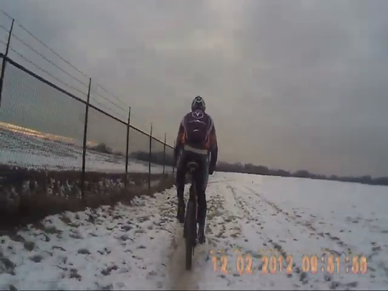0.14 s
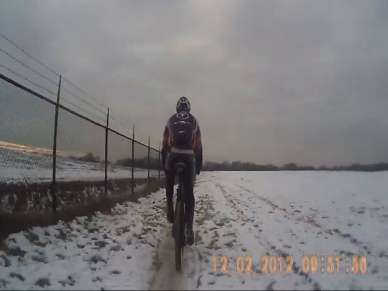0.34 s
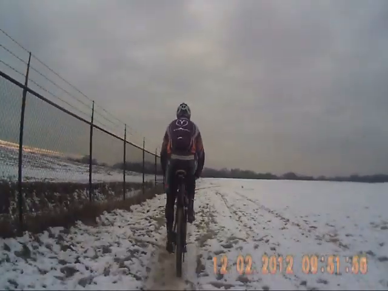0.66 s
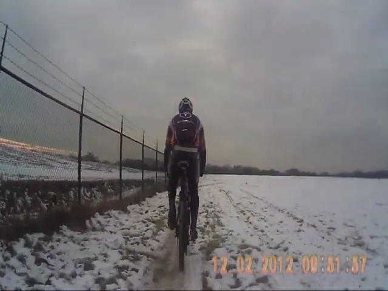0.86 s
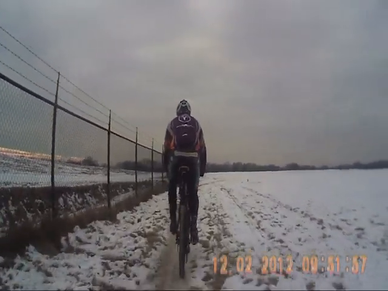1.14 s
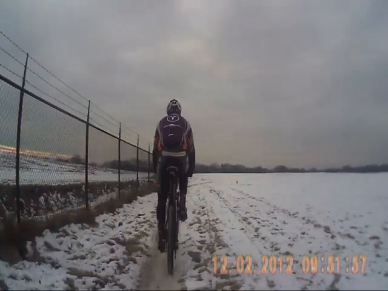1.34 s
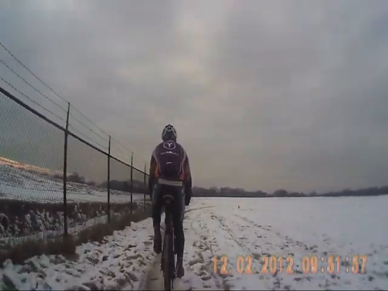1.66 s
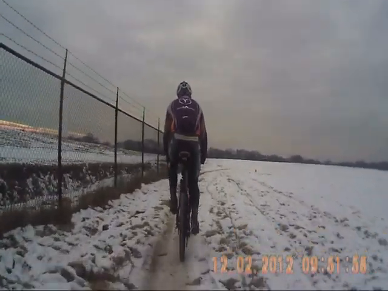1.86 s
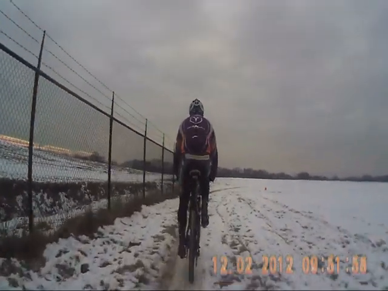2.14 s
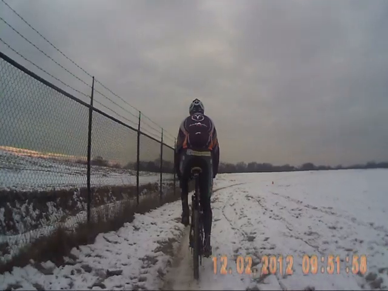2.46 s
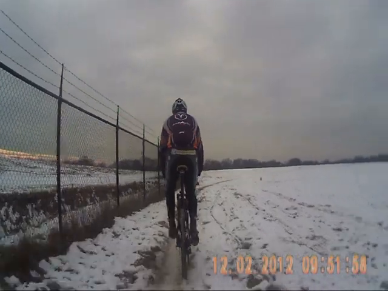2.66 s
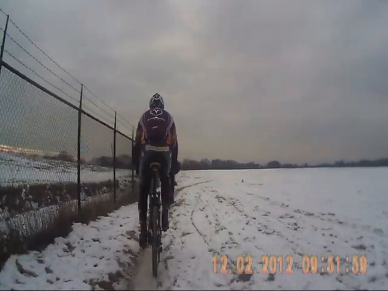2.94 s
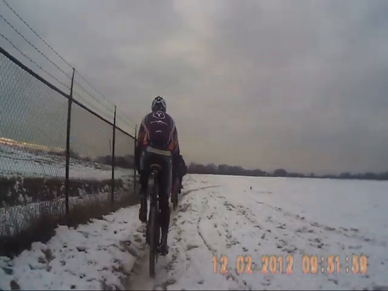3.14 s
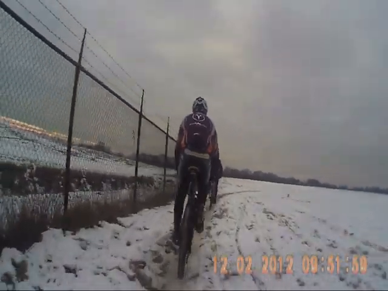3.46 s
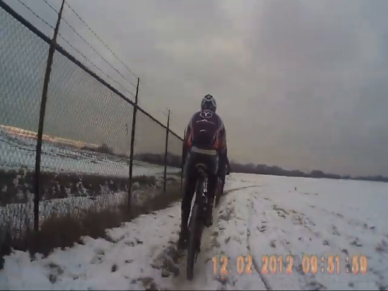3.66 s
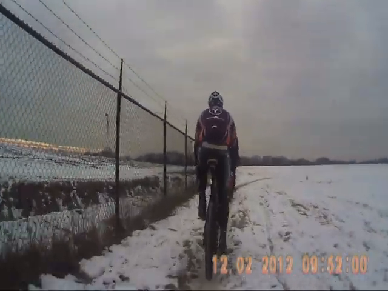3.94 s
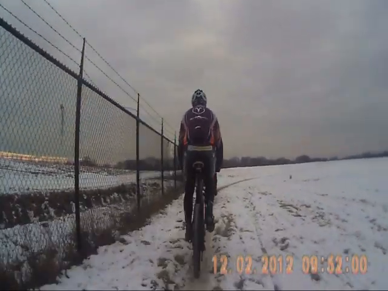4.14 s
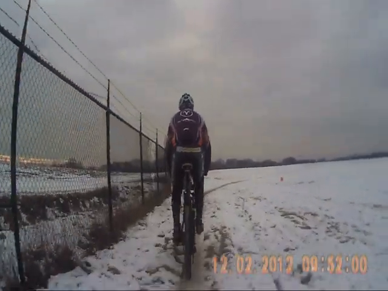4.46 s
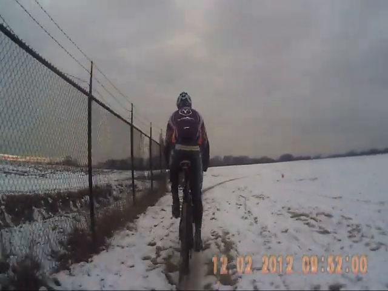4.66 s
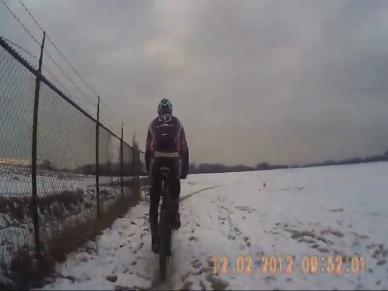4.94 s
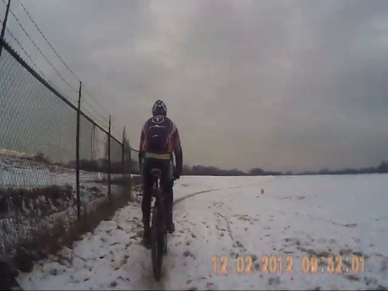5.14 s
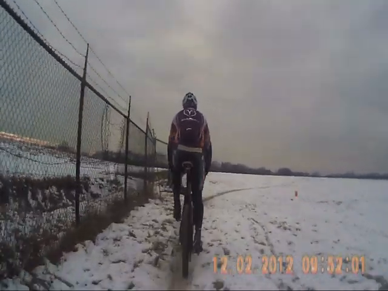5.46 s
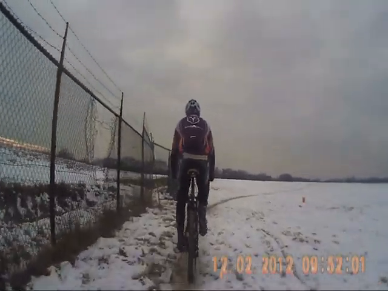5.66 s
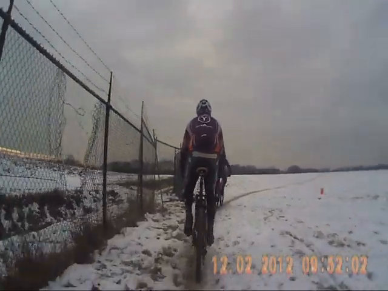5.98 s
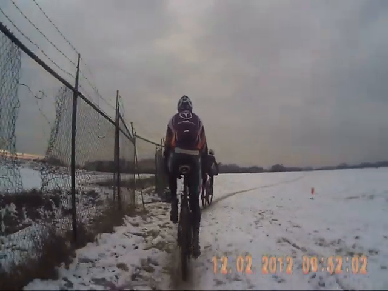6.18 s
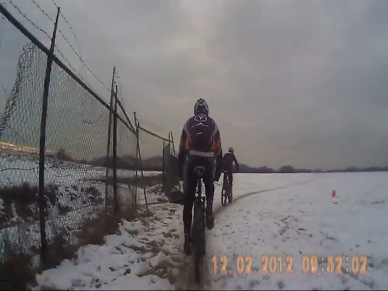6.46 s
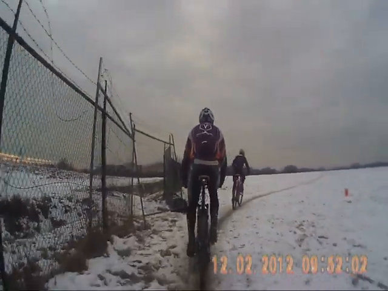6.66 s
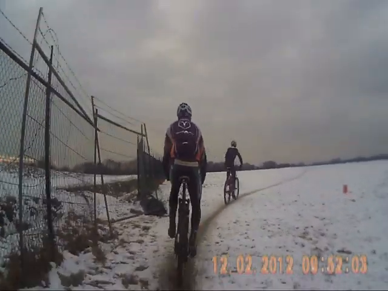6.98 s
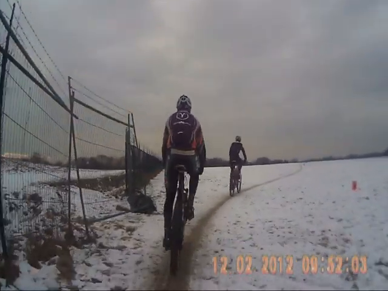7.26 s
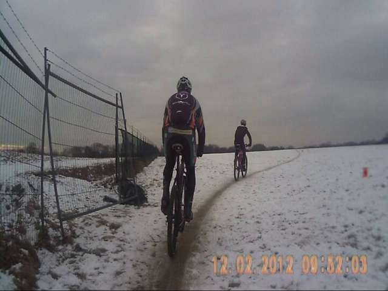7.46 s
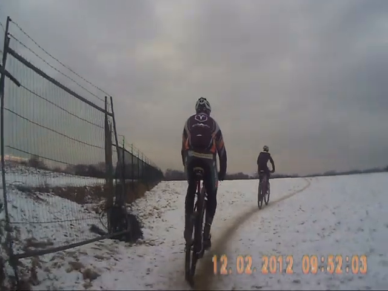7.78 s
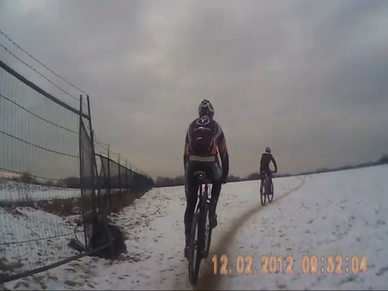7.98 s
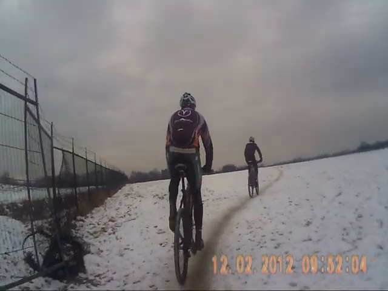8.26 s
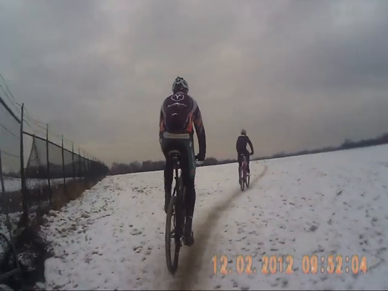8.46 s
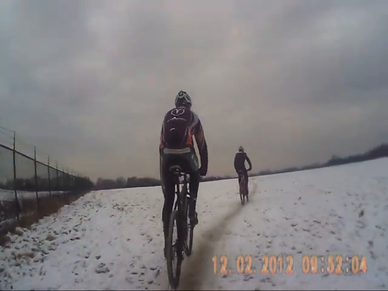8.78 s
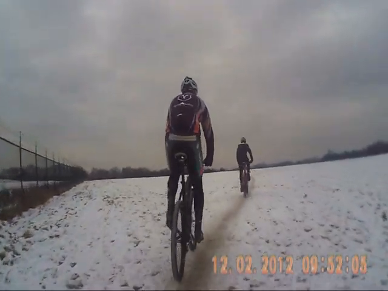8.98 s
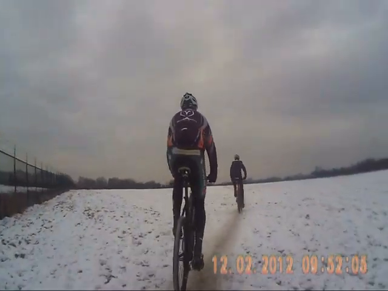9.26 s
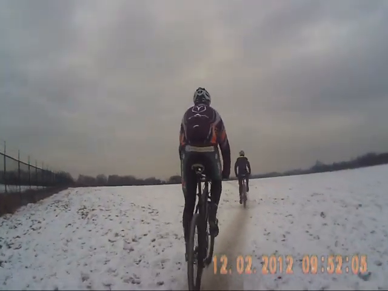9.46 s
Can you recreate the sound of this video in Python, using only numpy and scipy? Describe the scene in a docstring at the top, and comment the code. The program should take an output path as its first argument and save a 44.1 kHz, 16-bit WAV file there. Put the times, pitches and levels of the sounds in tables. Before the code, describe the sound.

Outdoors on a rutted snowy track, a small camera clamped to a bicycle handlebar picks up constant low tyre and wind rumble. A very deep hum swells and drops in short throbs, strongest around three seconds. Faint rattling continues underneath, with irregular dry knocks and small metallic ticks, the sharpest clack near 7.75 seconds. The close, rough pickup adds a gritty treble edge.

```python
"""A small camera clamped to the handlebar of a bicycle rides a rutted, snowy track for 9.6 s.
From the start the bar hums near 49 Hz as a lightly damped mode, over filtered-noise rumble of tyres and wind
and the rattle of loose parts, made of noise contacts ringing the case.
From 0.75 s knocks, and from 0.95 s hard metallic ticks, ring the case as decaying sines; the hum peaks near 3.2 s.
Throughout, the camera holds each of its 8000 readings a second, which mirrors the sound into the treble."""
import sys
import numpy as np
from scipy import signal
from scipy.fft import rfft, irfft, next_fast_len
from scipy.io import wavfile
from scipy.ndimage import uniform_filter1d, map_coordinates

SR = 44100
rng = np.random.default_rng(int(sys.argv[2]) if len(sys.argv) > 2 else 0)


def waveform_to_disk(signal):
    """Save audio, clipped to [-1, 1], as 16-bit WAV at the path in sys.argv[1]."""
    frames = np.transpose(np.atleast_2d(signal))
    scaled = np.clip(frames, -1, 1) * 32767
    samples = np.round(scaled).astype(np.int16)
    wavfile.write(sys.argv[1], SR, samples)


N = 424241

# Course of the ride before the bar's swing acts on it: time_s, rumble_db, rattle_db, small_bump_swing_db
RIDE_COURSE = [(0.0, -23.5, -41.5, -32), (0.5, -25.5, -44, -23), (1.5, -21.5, -43.5, -25.5),
               (1.66, -26.5, -41.5, -29), (1.75, -20.5, -44, -34), (1.93, -29, -45, -18),
               (2.14, -21, -42.5, -37), (2.8, -27, -44.5, -21), (3.05, -22.5, -42, -28),
               (3.43, -28.5, -45.5, -32), (3.55, -21, -44.5, -25), (3.76, -27, -44, -25),
               (3.9, -23, -44.5, -29), (4.2, -26, -45.5, -28.5), (4.85, -23.5, -41.5, -37),
               (5.0, -23.5, -45, -24), (5.6, -25.5, -44, -29.5), (5.79, -26.5, -44.5, -29),
               (6.0, -21.5, -44, -34), (6.8, -22, -41.5, -28), (6.95, -26.5, -46.5, -29),
               (7.25, -22, -43, -32), (7.85, -20.5, -44, -33), (8.15, -25, -44, -25.5),
               (9.08, -23, -44, -30.5), (9.16, -20.5, -43.5, -40), (9.62, -24, -43, -19.5)]
# Ruts that set the handlebar swinging: full_swing_s, hold_s, level_db
RUT_SWINGS = [(0.15, 0.06, -19), (0.36, 0.17, -27), (0.69, 0.13, -19.5), (1.09, 0.13, -17),
              (1.408, 0.045, -21), (1.72, 0.28, -16), (2.18, 0.033, -16), (2.5, 0.17, -14.5),
              (2.928, 0.07, -17), (3.03, 0.098, -12.5), (3.23, 0.074, -11.5), (3.4, 0.283, -20.5),
              (3.83, 0.07, -16), (3.95, 0.086, -15.5), (5.06, 0.16, -31), (5.428, 0.091, -22),
              (5.628, 0.05, -18.5), (5.948, 0.064, -21.5), (6.302, 0.14, -26.5), (6.568, 0.042, -21),
              (6.8, 0.07, -13.5), (6.998, 0.19, -20), (7.53, 0.044, -25), (7.678, 0.16, -19),
              (7.92, 0.092, -14.5), (8.218, 0.18, -18), (8.538, 0.059, -20), (8.848, 0.037, -21),
              (8.958, 0.32, -22), (9.38, 0.046, -19.5)]
# Relative spectrum of tyre and wind rumble: frequency_hz, density_db (per Hz)
RUMBLE_SPECTRUM = [(10, -13), (22, -2), (34, -16.5), (60, -2.5), (100, -5.5), (128, -1), (185, -9.5),
                   (240, -3), (330, -9), (405, -26.5), (455, -18.5), (520, -29), (850, -46), (1500, -36.5),
                   (4000, -64)]
# Resonances of case and clamp: frequency_hz, width_hz, relative_level_db
CASE_MODES = [(730, 206, -21), (1160, 75, -4), (1250, 107, -4), (1471, 99, -4), (1704, 53, -0.5),
              (1833, 123, -5), (2027, 94, -19.5), (2120, 304, -12.5), (2381, 122, -13.5),
              (2700, 190, -22.5), (3080, 310, -24), (3306, 147, -15.5), (3543, 157, -16),
              (3796, 440, -22.5)]
# Knocks of loose parts: start_s, main_peak_db, thud_peak_db, low_peak_db
KNOCK_BLOWS = [(0.749, -38, -37, -37), (1.203, -44, -33, -28), (1.381, -30, -53, -40),
               (1.629, -29, -45, -42), (1.669, -36, -45, -39), (1.714, -30, -46, -37),
               (1.772, -31, -33, -26), (2.013, -28.5, -43, -49), (2.207, -40, -44, -29),
               (2.37, -31, -42, -45), (2.462, -29, -43, -33), (2.503, -29.5, -42, -26),
               (2.802, -28.5, -43, -48), (3.065, -26, -40.5, -34), (3.241, -33, -37, -32),
               (3.314, -35, -56, -38), (3.523, -27.5, -48, -38), (3.767, -32, -50, -42),
               (4.637, -39, -37, -30), (5.098, -30, -59, -37), (5.642, -32, -33, -31),
               (6.424, -35, -50, -30), (6.519, -29, -57, -44), (6.566, -33, -46, -32),
               (6.65, -32, -35, -35), (6.81, -24, -32, -29), (7.395, -27.5, -50, -34),
               (7.702, -28.5, -48, -39), (7.723, -27, -47, -32), (7.751, -20, -39, -30),
               (7.914, -30, -46, -31.5), (7.94, -29, -43, -28), (8.343, -29.5, -45, -47.5),
               (8.496, -28.5, -41, -40), (9.158, -24.5, -39, -34), (9.415, -23, -45, -39)]
# Hard ticks of metal on metal: start_s, high_peak_db, upper_peak_db
TICK_BLOWS = [(0.949, -35.5, -38), (1.585, -34, -46), (1.668, -35, -49), (1.779, -29.5, -49),
              (2.035, -41, -39), (2.371, -28, -31), (3.063, -46, -50), (3.078, -36, -50), (3.099, -35, -50),
              (3.106, -43, -50), (3.119, -36, -49), (3.242, -40, -50), (3.25, -41, -50), (3.577, -40, -48),
              (4.87, -35, -39), (5.588, -33.5, -31), (5.718, -39, -36), (6.83, -37, -48), (7.701, -26, -50),
              (7.722, -36, -47), (7.748, -30.5, -38), (7.761, -35, -53), (7.778, -35, -40),
              (7.787, -37, -50), (9.158, -34, -32)]
# Modes that move together: main, thud, low, high, upper
MODE_GROUPS = (CASE_MODES[4:7], CASE_MODES[:1], CASE_MODES[1:4], CASE_MODES[9:], CASE_MODES[7:9])

BAR_HZ, BAR_DRIFT_HZ = 48.7, 1.17  # bending mode, and the scale of its slow drift with the grip
SWING_UP_S, SWING_DOWN_S = 0.025, 0.021  # time constants of the bar's swing
SMALL_SPREAD_DB = 3.5  # scatter of the swing between the ruts
RATTLE_FOLLOWS, RUMBLE_FOLLOWS = 0.14, 0.08  # dB gained for each dB of the bar's swing
READINGS_HZ, STEPS_PER_READING = 8000, 6
TOP_HZ = 15830  # upper limit of the output


def amp(db):
    """A level in decibels is twenty times the logarithm of the amplitude ratio returned."""
    return 10 ** (np.asarray(db) / 20)


def unit(x):
    """Division by the root mean square gives a signal unit effective value."""
    return x / np.sqrt(np.mean(x ** 2) + 1e-20)


def curves(rows):
    """Linear interpolation in time gives one value per sample for each column after the first."""
    time_s, *columns = np.transpose(rows)
    return [np.interp(np.arange(N) / SR, time_s, column) for column in columns]


def wobble(rate_hz):
    """Spline interpolation of independent normal knots, rate_hz a second, gives a smooth random curve."""
    knots = rng.standard_normal(int(N * rate_hz / SR) + 4)
    return map_coordinates(knots, [np.arange(N) * rate_hz / SR])


def filtered(x, response):
    """A linear system multiplies the spectrum by its complex frequency response."""
    padded = next_fast_len(N + SR // 2)
    spectrum = rfft(x, padded) * response(np.fft.rfftfreq(padded, 1 / SR))
    return irfft(spectrum, padded)[..., :N]


def ring(force, modes):
    """Modal superposition: a force drives a row of resonances, neighbours in opposite sense."""
    def response(hz):
        total = 0
        for k, (mode_hz, width_hz, level_db) in enumerate(modes):
            loss = 1j * hz * width_hz
            total = total + (-1) ** k * amp(level_db) * loss / (mode_hz ** 2 - hz ** 2 + loss)
        return total
    return filtered(force, response)


def scuffs(times_s, sizes, rise_s, fall_s):
    """Superposed short contacts: each envelope swells and dies with its own time constant."""
    positions = np.clip((times_s * SR).astype(int), 0, N - 1)
    train = np.bincount(positions, sizes, N)
    t = np.arange(SR // 20) / SR
    contact = (1 - np.exp(-t / rise_s)) * np.exp(-t / fall_s)
    return signal.fftconvolve(train, contact)[:N]


def swing(small_db):
    """Exponential growth and decay: the bar swings up to each rut, holds, then dies to the small bumps."""
    t = np.arange(N) / SR
    size = amp(small_db + SMALL_SPREAD_DB * wobble(13))
    for full_swing_s, hold_s, level_db in RUT_SWINGS:
        rise = np.exp(-np.clip(full_swing_s - t, 0, None) / SWING_UP_S)
        fall = np.exp(-np.clip(t - full_swing_s - hold_s, 0, None) / SWING_DOWN_S)
        size = np.maximum(size, amp(level_db) * rise * fall)
    return 20 * np.log10(size)


def handlebar(level_db, pitch_hz):
    """A single lightly damped bending mode gives a sine; small bumps shake its pitch and size."""
    phase = 2 * np.pi * np.cumsum(pitch_hz + 2.78 * wobble(20)) / SR
    size = np.sqrt(2) * amp(level_db + 1.84 * wobble(25))  # effective value to peak
    return size * np.sin(phase)


def rumble(level_db, bar_db):
    """Shaped broadband noise lumps as the tread bites the crust; its deepest part grows with the bar's swing."""
    table_hz, table_db = np.transpose(RUMBLE_SPECTRUM)

    def spectrum(hz):
        return amp(np.interp(np.log(hz + 1), np.log(table_hz + 1), table_db))

    lumps = amp(0.4 * wobble(10) + 1.68 * wobble(40))
    noise = filtered(lumps * rng.standard_normal(N), spectrum)
    deep = filtered(noise, lambda hz: 1 / (1 + (hz / 105) ** 6))
    ruts_db = uniform_filter1d(bar_db - bar_db.mean(), SR // 2)  # mean over half a second
    deep_gain = amp(0.67 * ruts_db)
    return amp(level_db) * unit(noise + (deep_gain - 1) * deep)


def rattle(level_db):
    """Random impacts over steady rubbing drive the modes; some contacts shake all groups, others only one."""
    def contacts(count):
        draws = rng.random((count, 2))
        size_db = np.minimum(-3.2 * np.log(draws[:, 1]), 12)  # many small, few large
        return unit(scuffs(draws[:, 0] * N / SR, amp(size_db), rise_s=0.0011, fall_s=0.0019))

    shared = 1.12 * contacts(count=1200)
    rubbing = 0.64
    sound = 0
    for modes in MODE_GROUPS:
        own = contacts(count=1500)
        force = (rubbing + shared + own) * amp(0.69 * wobble(18))
        sound = sound + ring(force * rng.standard_normal(N), modes)
    return amp(level_db) * unit(sound)


def knocks():
    """Contact hardness selects the modes: soft knocks reach the lower ones, hard ticks the upper ones."""
    soft = blows(KNOCK_BLOWS, MODE_GROUPS[:3], rise_s=0.00088, damping=1.0)
    hard = blows(TICK_BLOWS, MODE_GROUPS[3:], rise_s=0.00077, damping=0.82)
    return soft + hard


def blows(table, groups, rise_s, damping):
    """Free decay after an impact: each blow swells briefly, rings at fresh strengths, and wide modes die first."""
    sound = np.zeros(N + SR)
    t = np.arange(SR // 12) / SR
    for start_s, *peaks_db in table:
        start = round(start_s * SR)
        for modes, peak_db in zip(groups, peaks_db):
            mode_hz, width_hz, mode_db = np.transpose(modes)[:, :, None]
            swell = (1 - np.exp(-t / rise_s)) * np.exp(-np.pi * damping * width_hz * t)
            strength = amp(mode_db + 2.0 * rng.standard_normal(mode_hz.shape))
            turn = rng.random(mode_hz.shape)  # starting phase in cycles
            wave = np.sum(strength * swell * np.sin(2 * np.pi * (mode_hz * t + turn)), 0)
            sound[start:start + len(t)] += amp(peak_db) * wave / abs(wave).max()
    return sound[:N]


def scene():
    """Superposition with common excitation: what flexes the bar also shakes tyres and loose parts."""
    rumble_db, rattle_db, small_db = curves(RIDE_COURSE)
    bar_db = swing(small_db)
    bar_hz = BAR_HZ + BAR_DRIFT_HZ * wobble(8)
    shake_db = bar_db - bar_db.mean()
    hum = handlebar(bar_db, bar_hz)
    tyres_and_wind = rumble(rumble_db + RUMBLE_FOLLOWS * shake_db, bar_db)
    loose_parts = rattle(rattle_db + RATTLE_FOLLOWS * shake_db)
    return (hum + tyres_and_wind + loose_parts + knocks())[None]


def record(dry):
    """Zero-order hold: low-passed readings kept as stair steps mirror the sound upward, up to a sharp cut-off."""
    readings = signal.resample_poly(dry, READINGS_HZ, SR, axis=1)
    steps = np.repeat(readings, STEPS_PER_READING, axis=1)
    held = signal.resample_poly(steps, SR, STEPS_PER_READING * READINGS_HZ, axis=1)[:, :N]
    held = np.pad(held, ((0, 0), (0, N - held.shape[1])))
    return filtered(held, lambda hz: hz < TOP_HZ)


dry = scene()
out = record(dry)
waveform_to_disk(out)
```